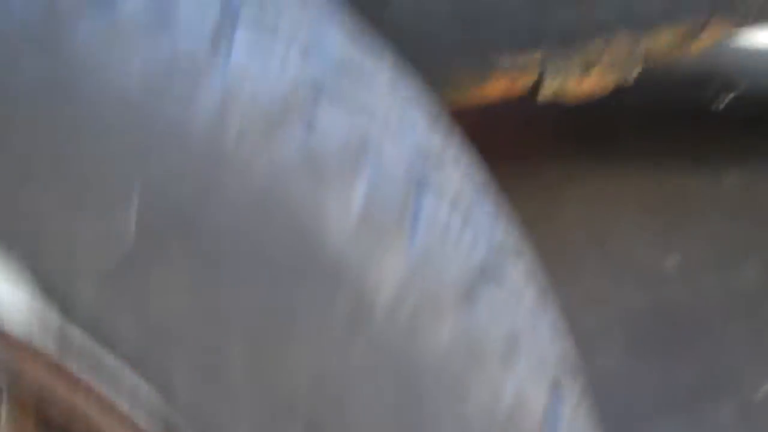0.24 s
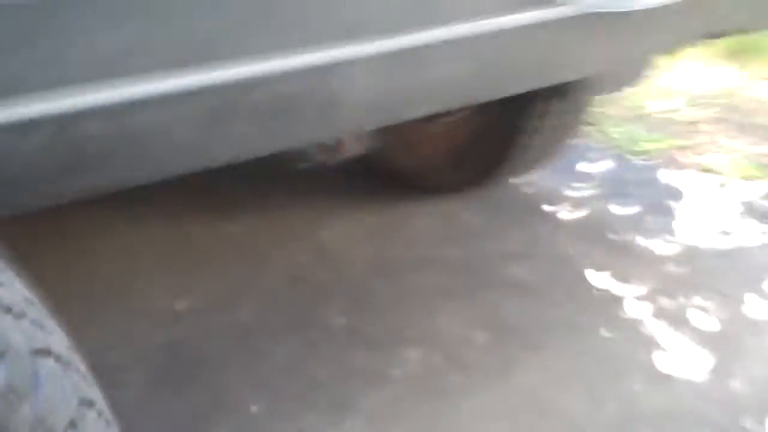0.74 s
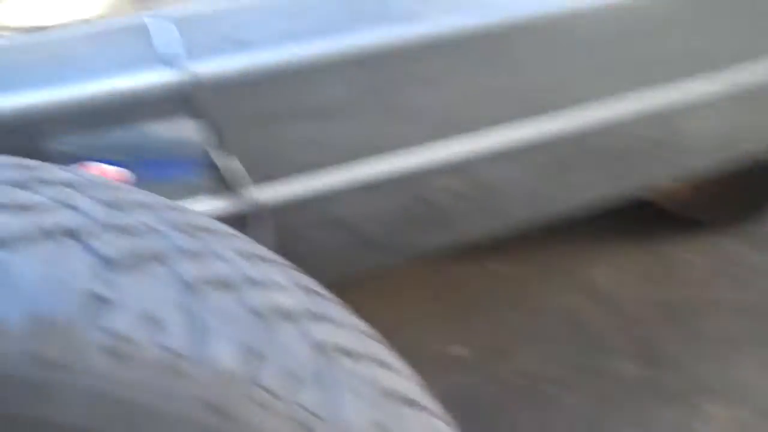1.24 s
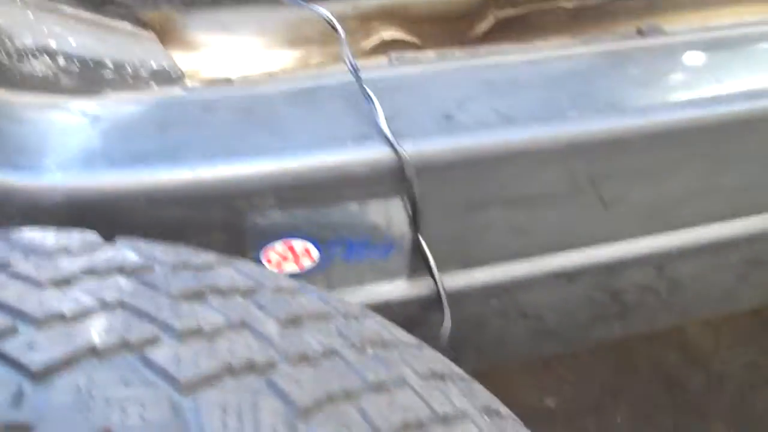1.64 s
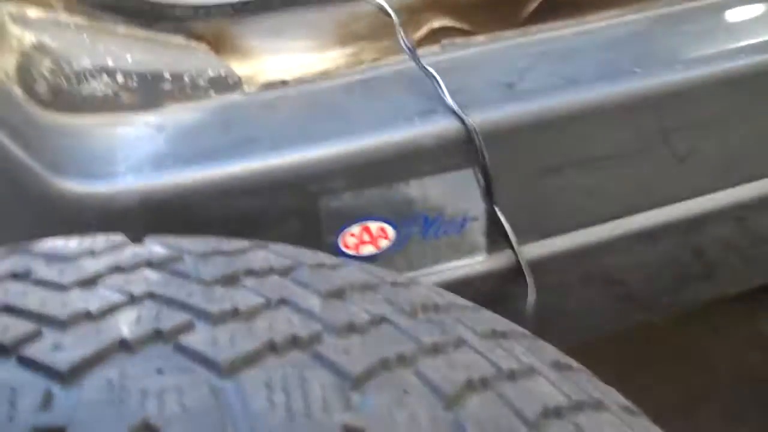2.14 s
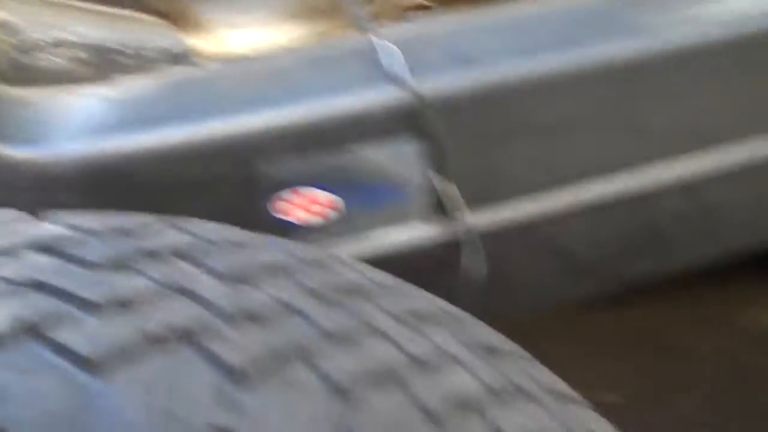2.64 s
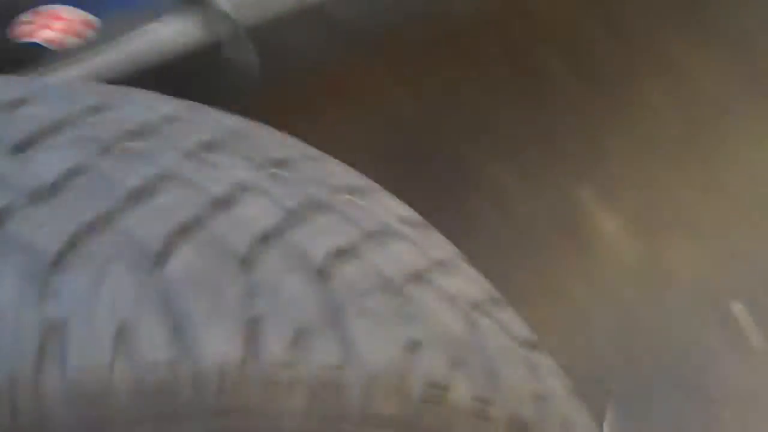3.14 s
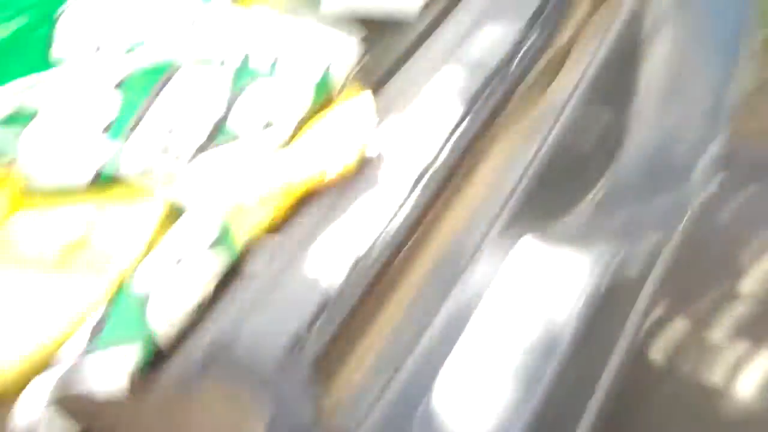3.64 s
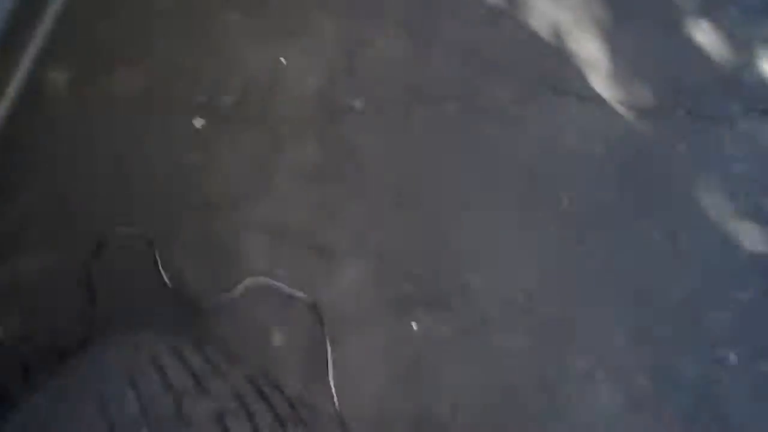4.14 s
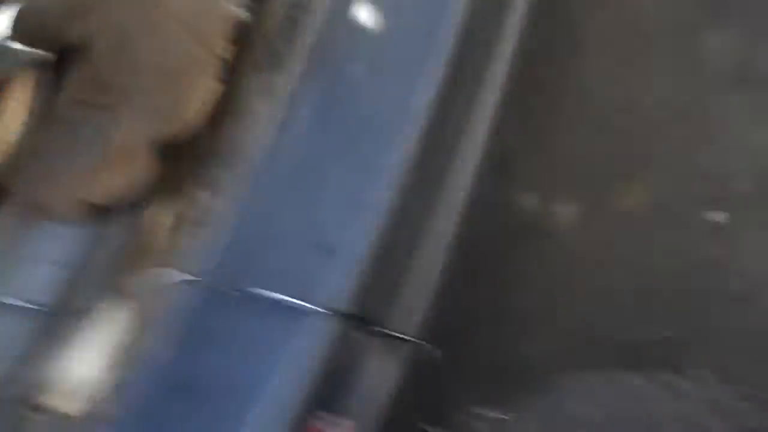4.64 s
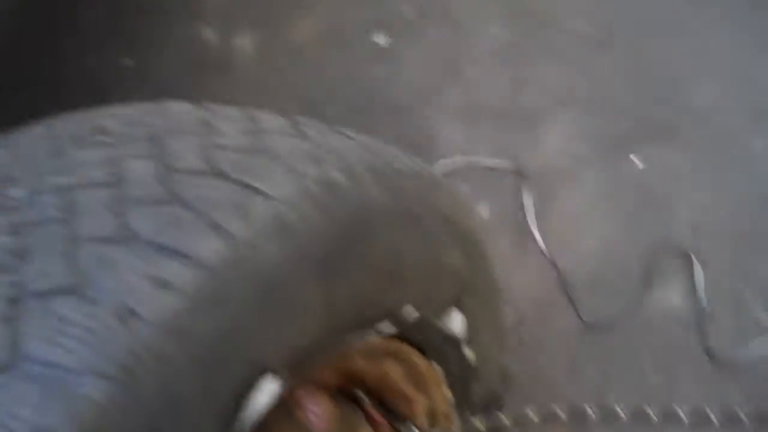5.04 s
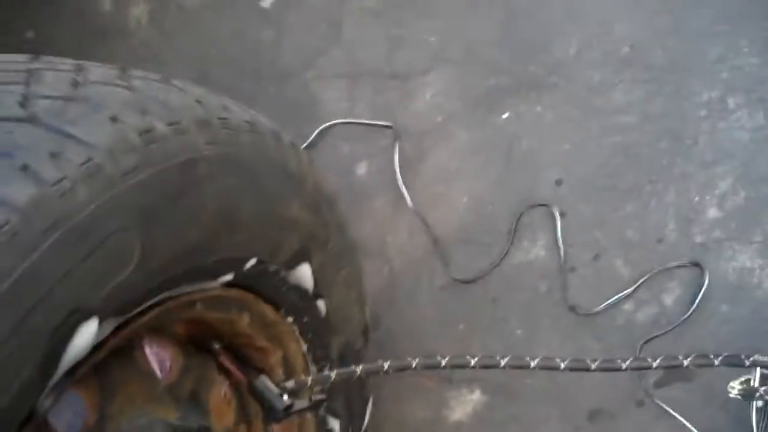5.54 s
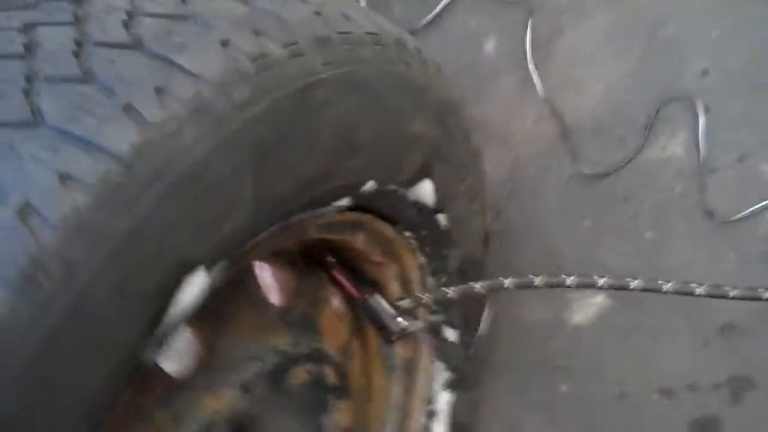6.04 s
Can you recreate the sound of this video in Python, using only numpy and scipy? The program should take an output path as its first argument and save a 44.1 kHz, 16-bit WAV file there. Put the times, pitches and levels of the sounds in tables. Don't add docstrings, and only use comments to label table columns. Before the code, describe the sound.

From 0 to about 6.3 seconds a small piston air compressor runs nonstop outdoors, filling a car tire, heard close on a hand-held stereo phone. It turns about thirty-two times a second, so the strokes fuse into a rough, fluttering drone. Intake thumps give a throbbing hum in the low mids, uneven knocks make the casing ring with hard metallic tones, and gear rattle with air hiss pulses in two quick gusts per turn. In the first second the level wavers quickly as the phone swings; from roughly 1.2 to 2.5 it is steadier, then around 3 to 5 the colour shifts again, some metal tones standing out and others receding. The pitch sags very slightly as the tire hardens. Brief reflections from ground and car body roughen the treble, which differs left to right. It cuts off still running.

```python
import sys
import numpy as np
from scipy import signal
from scipy.fft import rfft, irfft, next_fast_len
from scipy.io import wavfile

SR = 44100
rng = np.random.default_rng(int(sys.argv[2]) if len(sys.argv) > 2 else 0)


def field_ratio(decibels):
    return 10 ** (np.asarray(decibels, dtype=float) / 20)


def inscribe(sig):
    pcm = np.round(np.clip(np.atleast_2d(sig).T, -1, 1) * 32767)
    wavfile.write(sys.argv[1], SR, pcm.astype(np.int16))


N = 277830

# t/s, speed/(turns per s)
CRANK_SPEED = [(0.0, 32.559), (0.45, 32.539), (0.9, 32.398), (1.35, 32.335), (1.8, 32.316), (2.25, 32.307),
               (2.7, 32.265), (3.15, 32.165), (3.6, 32.102), (4.05, 32.064), (4.5, 32.136), (4.95, 31.964),
               (5.4, 31.866), (5.85, 31.883), (6.3, 31.51)]


def crank_turns():
    start_turn = -.099
    return start_turn + np.cumsum(in_time(CRANK_SPEED)[0]) / SR


# multiple of the crank rate, level/dB
THUMP_PARTIALS = [(1, -43), (2, -29), (3, -33), (4, -29), (5, -18), (6, -28), (7, -22), (8, -13), (9, -17),
                  (10, -7), (11, -8), (12, 0), (13, -4), (14, 0), (15, -12), (16, -10), (17, -11), (18, -3),
                  (19, -18), (20, -11)]
# crank angle/turns, level/dB
INTAKE_PUFFS = [(0.122, 15), (0.301, 17.5), (0.52, 9.5), (0.796, 13)]
THUMP_DELAY = [.63, .36, -.05, -.05, -.08]


def intake_thump(turn, levels_db, wobble_db, slip):
    angle, puff_db = np.transpose(INTAKE_PUFFS)
    groups = np.zeros((4, N))
    late = slip * drift(6.3)
    for k, db in THUMP_PARTIALS[1:]:
        lag = np.angle(np.sum(field_ratio(puff_db) * np.exp(-2j * np.pi * k * angle)))
        group = int(k > 9) + int(k > 11) + int(k > 14)
        delay = THUMP_DELAY[group + int(k > 4)]
        phase = 2 * np.pi * k * (turn + late - delay) + lag + k * slip * drift(2.1)
        groups[group] += field_ratio(db + wobble_db * drift(4)) * np.cos(phase)
    trim_db = [-0.96, -1.0, -0.77, -1.6]
    return sum(field_ratio(db + trim) * rms_one(group) for db, trim, group in zip(levels_db, trim_db, groups))


# crank angle/turns, level into head/dB, into cylinder wall/dB, into valve plate/dB
CONTACTS = [
    (.97, 0, -2, -7),
    (.055, -6, 0, -4),
    (.19, -8, -6, -1),
    (.33, -12, -6, -6),
    (.58, -7, -6, 0),
    (.70, -13, -9, -1),
    (.88, -13, -7, -6),
]


def knocks(turn, modes, part, jitter_s, scrape_db, scrape_s, sign=1):
    uneven_db = 1.3
    contacts = np.array(CONTACTS)
    angles = np.arange(-1, turn[-1])[:, None] + contacts[:, 0]
    chance = rng.standard_normal((2,) + angles.shape)
    at = np.interp(angles, turn, np.arange(N), left=-1e4, right=-1e4) + jitter_s * SR * chance[0]
    heights = field_ratio(contacts[:, part] + uneven_db * chance[1])
    clicks = np.zeros(N)
    inside = (at > 0) & (at < N - 1)
    clicks[at[inside].astype(int)] = heights[inside]
    fading = signal.lfilter([1], [1, -np.exp(-1 / (scrape_s * SR))], clicks)
    force = clicks + field_ratio(scrape_db) * fading * rng.standard_normal(N)
    rings = np.zeros(N)
    for k, (hz, db, t60) in enumerate(modes):
        rings += sign ** k * field_ratio(db + 1.5 * drift(1.2)) * ring(force, hz, t60)
    span = [.94 * min(modes)[0], 1.05 * max(modes)[0]]
    return rms_one(band(rings, span))


# f/Hz, level/dB, t60/s
BASE = [(620, -35, 0.015), (765.8, 9, 0.23), (845, 12.5, 0.083), (899, -4, 0.11), (508, 11, 0.13)]
HEAD = [(1060.5, -6.5, 0.069), (1130, 8.5, 0.049), (1228, 4, 0.034), (1396, 5.5, 0.02), (1310, -10, 0.0065),
        (1092, -27, 0.011)]
WALL = [(1656, -1, 0.067), (1684, 11.5, 0.13), (1722, 6.5, 0.19), (1487, -22, 0.062)]
PLATE = [(2061, 6.5, 0.049), (2145, 2.5, 0.031), (2050, -17, 0.099)]
REED = [(2250, -4, 0.066), (2292, 6.5, 0.043), (2525, 2, 0.024), (2594, 1, 0.023), (2744, -3.5, 0.029),
        (3318, -4, 0.037), (4137, 2, 0.026), (4500, -28, 0.0075)]


def ringing_casing(turn, base_db, head_db, wall_db, plate_db, reed_db):
    metal = field_ratio(base_db - 2.5) * knocks(turn, BASE, part=1, jitter_s=1.0e-4,
                                        scrape_db=-22.5, scrape_s=.0005, sign=-1)
    metal += field_ratio(head_db - .53) * knocks(turn, HEAD, part=1, jitter_s=.45e-4, scrape_db=-25, scrape_s=.0013)
    metal += field_ratio(wall_db - .3) * knocks(turn, WALL, part=2, jitter_s=.4e-4, scrape_db=-26, scrape_s=.0012)
    metal += field_ratio(plate_db + 2.5) * knocks(turn, PLATE, part=3, jitter_s=.25e-4, scrape_db=-33, scrape_s=.001)
    metal += field_ratio(reed_db - 1.0) * knocks(turn, REED, part=3, jitter_s=.3e-4,
                                         scrape_db=-25, scrape_s=.0014, sign=-1)
    return high_pass(metal, 420, order=4)


# crank angle/turns, level/dB
GUSTS = [
    (0, 2),
    (.08, 1.5),
    (.3, -.5),
    (.46, -3.5),
    (.51, -2.5),
    (.56, 1.5),
    (.75, 0),
    (.91, -2),
    (.98, 1.5),
    (1, 2),
]
# f/Hz, level/dB
HISS_COLOUR = [(30, -31), (60, -24), (100, -20), (200, -23.5), (400, -3), (650, -4), (950, -2.5), (1200, 6),
               (1900, 5.7), (2300, 5), (3050, -0.5), (3600, 0), (4150, 4), (5000, 4), (14000, 3.5)]
# f/Hz, likeness (1 is the same)
LIKENESS = [(40, .5), (80, .75), (130, .95), (290, .97), (630, .93), (1370, .75), (2990, .45), (6550, .15),
            (14300, 0)]


def rattle_and_hiss(turn, shading, patchy_db, grit_db):
    angle, gust_db = np.transpose(GUSTS)
    gust = np.interp(turn % 1, angle, gust_db) + .5 * drift(22)
    white = rng.standard_normal((2, 2, N)) * field_ratio(grit_db * drift(300))
    out = 0
    edges = 20 * 2 ** np.arange(0, 10, .5)
    for k, (low, high) in enumerate(zip(edges, edges[1:])):
        mid, side = band(white[k % 2], [low, high])
        hz = np.sqrt(low * high)
        alike = np.clip(at_hz(LIKENESS, hz), -1, 1)
        shade_db = shading[np.searchsorted([450, 640, 900, 1280, 1800, 2560], hz)]
        shade_db = .7 * (shade_db - np.mean(shade_db))
        gusting_db = 1.06 * gust * min(hz / 600, 1)
        gain = field_ratio(shade_db + gusting_db + patchy_db * drift(11.2))
        out = out + gain * (np.sqrt(1 + alike) * mid + np.sqrt(1 - alike) * side * [[1], [-1]])
    return shaped(rms_one(out), lambda hz: field_ratio(at_hz(HISS_COLOUR, hz)))


def reflections(x, t60, cut_hz):
    time = np.arange(SR // 10) / SR
    tails = rng.standard_normal((2, len(time))) * field_ratio(-60 * time / t60)
    tails /= np.sqrt(np.sum(tails ** 2, axis=1, keepdims=True))
    wet = signal.fftconvolve(x[None], tails, axes=1)[:, :N]
    return high_pass(wet, cut_hz, order=2)


# t/s, bearing round the pump/turns, height 0-1, nearness/dB
PHONE_PATH = [(0.0, -1.25, 0.3, 0), (0.35, -1.315, 0.36, 1.2), (0.57, -1.18, 0.08, -1.5),
              (0.8, -1.25, 0.38, 2), (1.2, -1.1, 0.01, -0.26), (1.9, -1.065, 0, 0.0),
              (2.5, -1.18, 0.06, 0.5), (3.0, -0.96, 0.22, -1.5), (3.3, -0.854, 0.75, -0.4),
              (3.8, -0.88, 0.54, 0.9), (4.25, -0.87, 0.61, 0.4), (4.75, -0.97, 0.76, 0.5),
              (5.15, -1.1, 1.0, -1.0), (5.6, -1.06, 0.56, -1.1), (5.9, -1.03, 0.32, -1.5),
              (6.3, -1.19, 0.3, 1.5)]
# level/dB, lobe/dB, facing/turns, change from lowest to highest phone/dB
RADIATION = [
    (-45.5, 1.2, 0.0093, 0.1),
    (-34, 7, 0.35, -3.6),
    (-32.5, 4.5, 0.84, -3),
    (-30, 4, 0.19, -14),
    (-33, 2, 0.33, 2),
    (-25, 1.5, 0.71, 1),
    (-33.5, 8.5, 0.97, 0.8),
    (-27.5, 4.5, 0.54, 2),
    (-32, 3.5, 0.94, 3.5),
    (-23.8, 0.5, .99, 0.9),
]


def levels_at_phone():
    bearing, height, near_db = in_time(PHONE_PATH)
    levels = []
    for db, lobe_db, facing, lift_db in RADIATION:
        facing_db = lobe_db * np.cos(2 * np.pi * (bearing - facing))
        levels.append(db + near_db + facing_db + lift_db * height)
    return levels


def rms_one(x):
    return x / np.sqrt(np.mean(x ** 2) + 1e-20)


def in_time(rows):
    s, *columns = np.transpose(rows)
    return [np.interp(np.arange(N) / SR, s, column) for column in columns]


def at_hz(points, hz):
    table_hz, values = np.transpose(points)
    return np.interp(np.log(hz), np.log(table_hz), values)


def drift(rate):
    r = np.exp(-80 * np.pi * rate / SR)
    slow = signal.lfilter([1], [1, -2 * r, r * r], rng.standard_normal(N // 40 + 2002))[2000:]
    return np.interp(np.arange(N) / 40, np.arange(len(slow)), rms_one(slow))


def ring(force, hz, t60):
    r, w = field_ratio(-60 / (t60 * SR)), 2 * np.pi * hz / SR
    return signal.lfilter([0, np.sin(w)], [1, -2 * r * np.cos(w), r * r], force + 1e-18)


def band(x, span_hz):
    return signal.sosfilt(signal.butter(2, span_hz, "band", fs=SR, output="sos"), x)


def high_pass(x, cut_hz, order):
    return signal.sosfilt(signal.butter(order, cut_hz, "high", fs=SR, output="sos"), x)


def shaped(x, response):
    size = next_fast_len(N + 4096)
    hz = np.maximum(np.arange(size // 2 + 1) * SR / size, 1)
    return irfft(rfft(x, size) * response(hz), size)[..., :N]


def scene():
    turn = crank_turns()
    *thump_db, base_db, head_db, wall_db, plate_db, reed_db, hiss_db = levels_at_phone()
    metal = ringing_casing(turn, base_db, head_db, wall_db, plate_db, reed_db)
    pump = metal + intake_thump(turn, thump_db, wobble_db=0.7, slip=0.0055)
    shading = [hiss_db, thump_db[-1], base_db, head_db, wall_db, reed_db, hiss_db]
    air = field_ratio(-20.5) * rattle_and_hiss(turn, shading, patchy_db=1.0, grit_db=0.07)
    return pump + field_ratio(-1.5) * reflections(pump, t60=0.15, cut_hz=3000) + air


# f/Hz, left level/dB, right level/dB
PORTS = [(60, -0.7, 2), (2930, -1, 3.5), (4100, -1, 2.5), (5550, -5.5, 3.5), (5920, -3, 6), (6590, -4.5, 0),
         (6970, 1, -10.5), (7620, 7, -8.5), (8450, -0.5, -11), (9570, -6.5, -15.5), (11100, -14.5, -26.5),
         (12500, -17.5, -63), (13240, -12, -50), (13700, -13, -59)]


def microphone_ports(dry):
    port_hz, left_db, right_db = np.transpose(PORTS)
    cutoff_hz, left_lag_s = 14200, 5e-5

    def left_port(hz):
        lag = np.exp(-2j * np.pi * hz * left_lag_s)
        return field_ratio(np.interp(hz, port_hz, left_db)) * lag * (hz < cutoff_hz)

    def right_port(hz):
        return field_ratio(np.interp(hz, port_hz, right_db)) * (hz < cutoff_hz)

    return [shaped(dry[0], left_port), shaped(dry[1], right_port)]


def low_pass(x):
    return signal.sosfilt(signal.butter(12, 14910, fs=SR, output="sos"), x)


def record(dry):
    mix = np.clip(microphone_ports(dry), -.99, .99)
    return low_pass(mix)


dry = scene()
out = record(dry)
inscribe(out)
```